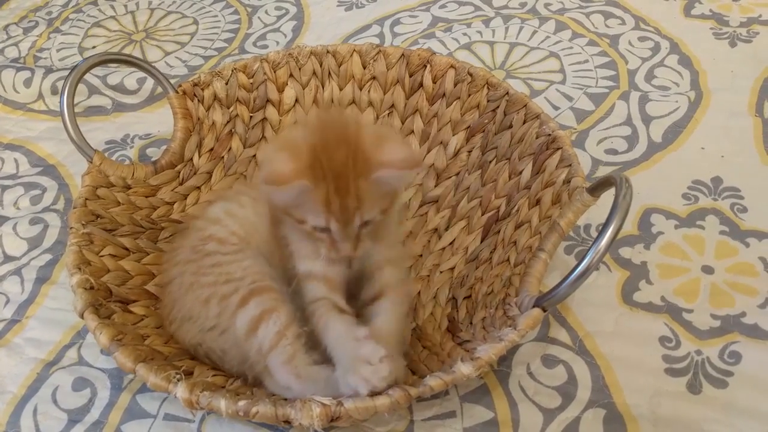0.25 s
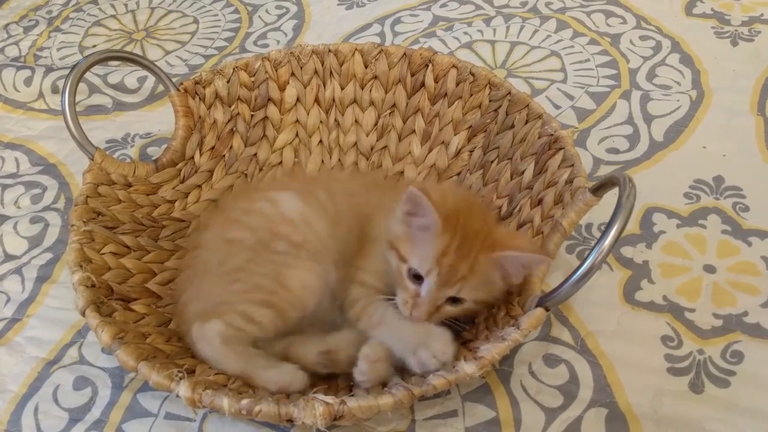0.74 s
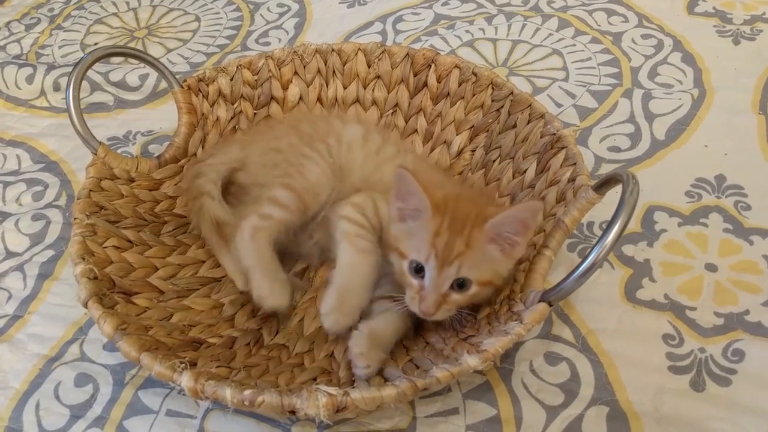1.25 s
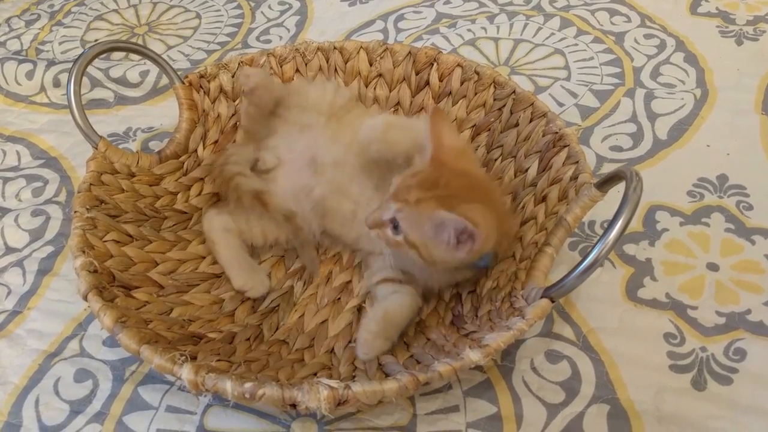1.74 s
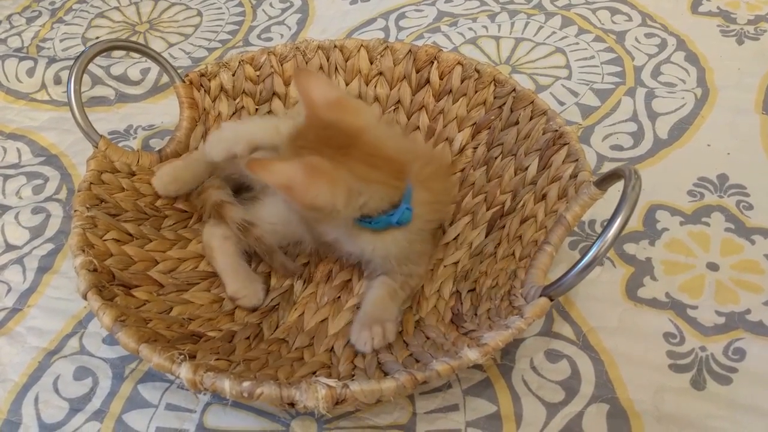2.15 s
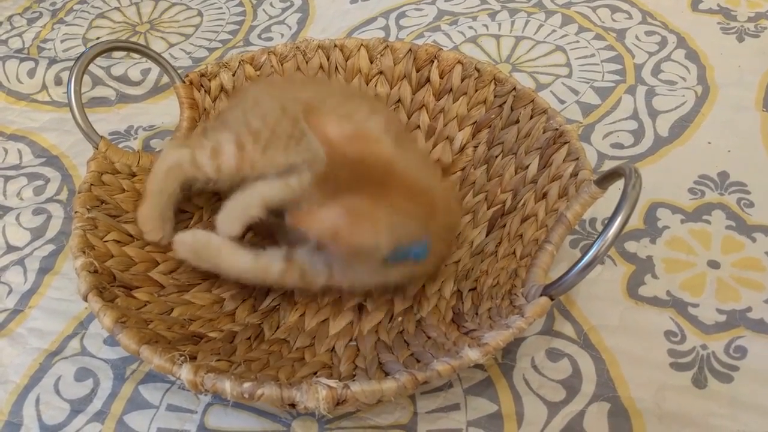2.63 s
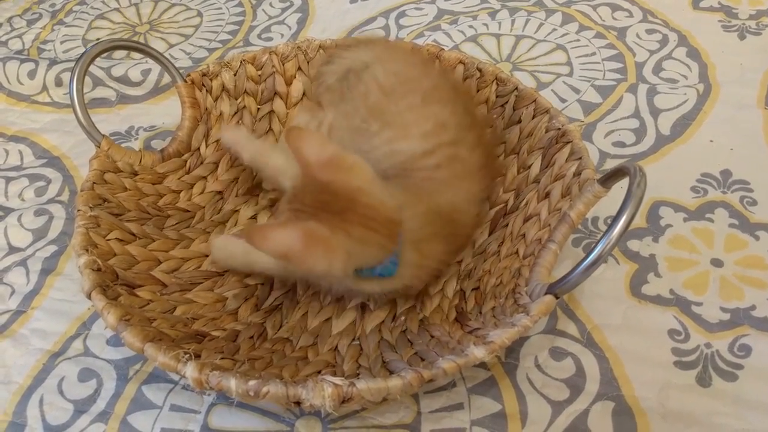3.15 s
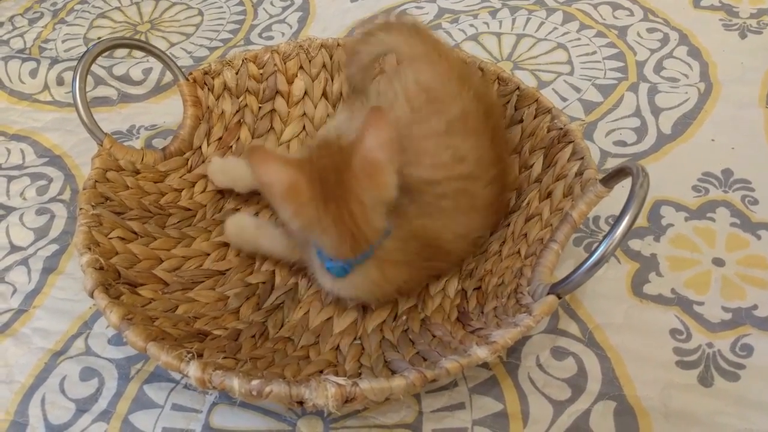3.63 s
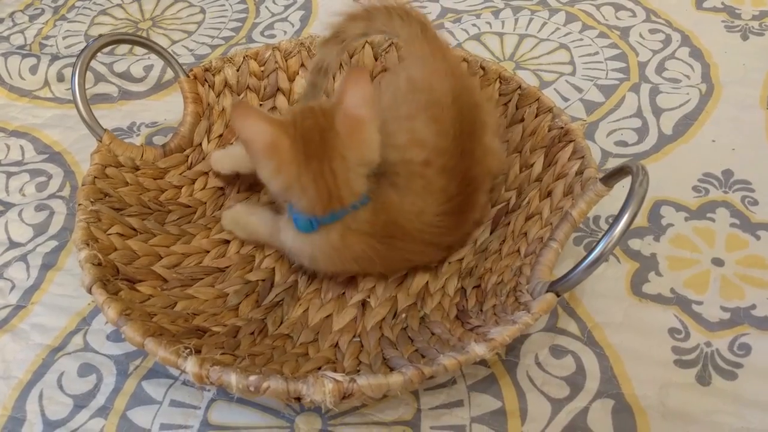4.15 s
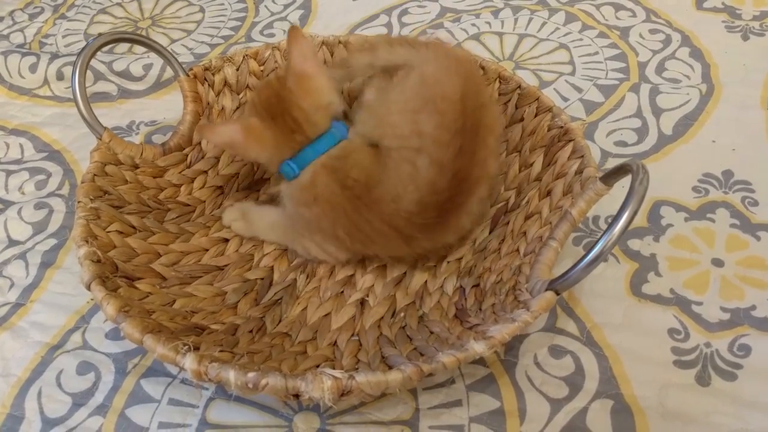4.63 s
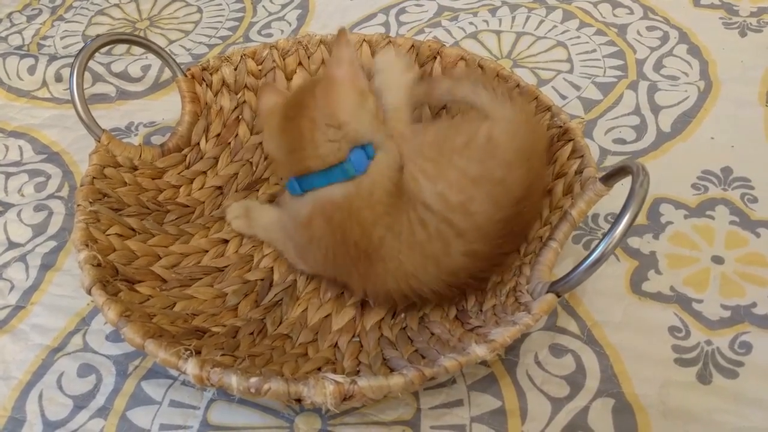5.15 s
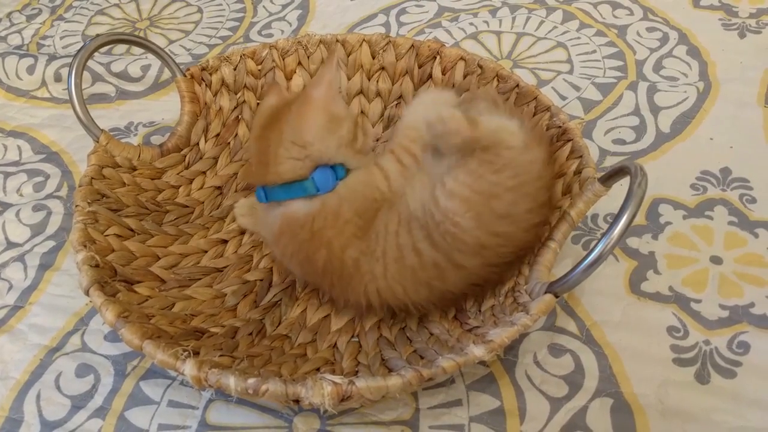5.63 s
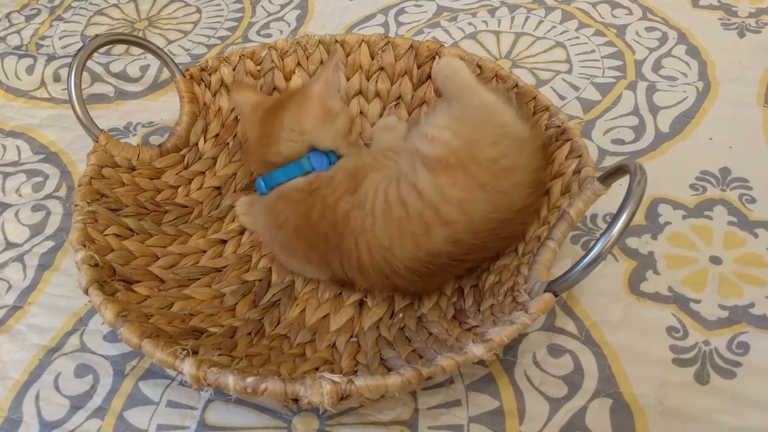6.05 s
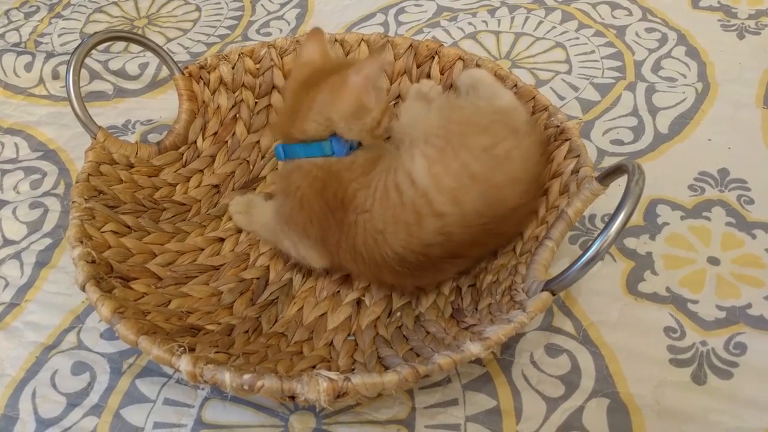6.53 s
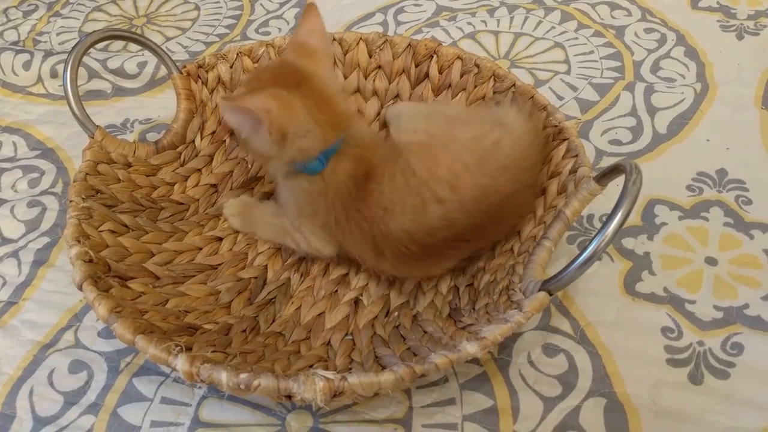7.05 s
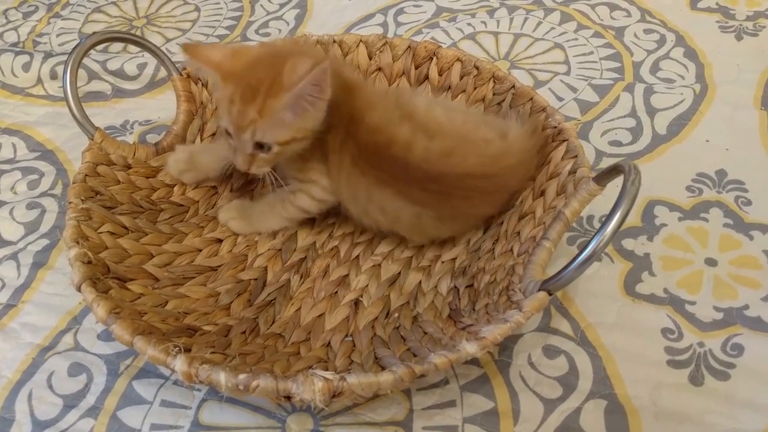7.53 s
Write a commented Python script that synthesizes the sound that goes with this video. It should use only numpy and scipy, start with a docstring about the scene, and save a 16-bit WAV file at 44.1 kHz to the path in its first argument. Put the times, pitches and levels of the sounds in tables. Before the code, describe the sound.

A low appliance hum and soft hiss lie beneath a small, high metallic bell, heard close up indoors in mono. Sparse jingles come first, then scratchy rubbing and brittle wicker clicks. A rapid cluster leads to one loud, piercing ting, followed by a calmer stretch with a muted basket thump. Finally the bell rattles densely among claw snaps, fur swishes and scuffs, with very little room echo.

```python
"""A kitten in a woven basket indoors, 7.8 s, over steady appliance hum and soft hiss.
From the start a pellet strikes and rolls in its collar bell, ringing three lobes, while fur and body rub the weave.
Claws snap strands from 0.7 s: crack, ring and knock. The body drops from 3.6 s, a resonant push and rattle.
The hardest bell strike comes at 4.2 s; from 6 s strikes crowd together up to the end."""
import sys
import numpy as np
from scipy import signal
from scipy.fft import rfft, irfft, next_fast_len
from scipy.io import wavfile
from scipy.ndimage import uniform_filter1d, map_coordinates

SR = 44100
rng = np.random.default_rng(int(sys.argv[2]) if len(sys.argv) > 2 else 0)


def dump_mix(stems):
    """Bounce the given channels to the path in sys.argv[1] as a 16-bit WAV at rate SR."""
    frames = np.atleast_2d(stems).T  # one column per channel
    limited = np.clip(frames, -1, 1)  # hard clip at full scale
    pcm = np.round(limited * 32767).astype(np.int16)
    wavfile.write(sys.argv[1], SR, pcm)


N = 343539

# Other motor lines of the appliance. Each row: frequency in Hz, mean level in dB rms.
MOTOR_LINES = [(58.8, -56), (221.4, -61), (244.3, -72), (259.1, -68)]
# Mains buzz, fan tones and their sums. Each row: mains buzz order, fan order, mean level in dB rms.
BUZZ_ORDERS = [(1, 0, -52), (1, 1, -54), (3, 0, -77), (4, 0, -76), (5, -1, -80), (5, 0, -69), (5, 1, -78),
               (0, 3, -69), (0, 4, -64), (0, 5, -58), (0, 6, -64), (0, 8, -72), (0, 9, -72)]
# Room rumble and hiss spectrum. Each row: frequency in Hz, relative density in dB.
ROOM_SPECTRUM = [(30, -23), (50, -8), (70, 2.5), (110, 2.5), (160, -5), (205, -8.5), (300, -10.5),
                 (350, -13), (600, -21.5), (1000, -25.5), (2200, -32), (3700, -34), (14000, -33.5),
                 (16000, -35)]
# Slow motion. Each row: time in seconds, fur rustle in dB (strands follow it), body drag in dB.
MOTION = [(0, -60.5, -71), (.45, -73, -68), (.95, -60.5, -75), (1.36, -81, -74), (1.45, -54, -75),
          (1.65, -61, -69), (2.2, -75, -67), (2.49, -63.5, -74), (2.69, -62, -65), (4.14, -70, -64.5),
          (4.34, -77, -66), (4.58, -66.5, -73), (5.03, -67, -64.5), (5.16, -97, -67.5), (5.4, -64, -71),
          (6.15, -70, -66), (6.5, -57, -68), (7, -62, -63.5), (7.27, -69.5, -63), (7.55, -52.5, -59),
          (7.79, -73, -63.5)]
# Short scuffs of paw and fur. Each row: time in seconds, nominal length in seconds, fur rustle in dB,
# strand rubbing in dB, body drag in dB, strand pitch in Hz.
SCUFFS = [(0.03, 0.17, -59, -70, -69, 5000), (0.839, 0.057, -67, -59.5, -80, 10400),
          (1.38, 0.061, -56.5, -73, -77, 6000), (1.43, 0.061, -56, -53, -69, 6400),
          (1.5, 0.063, -45, -52, -66, 5900), (1.582, 0.044, -61, -61, -71, 4530),
          (1.649, 0.14, -63, -54.5, -74, 4160), (1.834, 0.018, -63, -59, -79, 4500),
          (1.901, 0.023, -44.5, -51, -71, 1660), (1.975, 0.048, -57, -70, -61, 2100),
          (2.03, 0.035, -55, -64, -72, 5700), (2.15, 0.047, -47.5, -52, -61, 6130),
          (2.474, 0.021, -64, -59, -60, 8000), (2.789, 0.07, -71, -57, -57.5, 1050),
          (2.77, 0.095, -68, -58, -65, 2800), (3.29, 0.064, -73, -62, -59, 1000),
          (3.609, 0.061, -57, -55.5, -56, 9500), (3.67, 0.083, -59, -59.5, -58, 1680),
          (3.994, 0.16, -68, -61.5, -59.5, 5200), (4.335, 0.021, -55, -63, -66, 2100),
          (4.517, 0.035, -50, -54, -60, 3730), (4.557, 0.063, -58, -64, -68, 2400),
          (4.706, 0.042, -57.5, -55, -79, 4730), (4.771, 0.072, -62, -59, -77, 4350),
          (4.882, 0.068, -60, -63, -56, 1060), (5.011, 0.024, -57, -57, -54.5, 1680),
          (5.739, 0.028, -53.5, -63, -57.5, 5300), (5.833, 0.083, -84, -59, -65, 2340),
          (5.968, 0.1, -64, -52.5, -53, 1300), (6.062, 0.043, -62, -57.5, -60, 2440),
          (6.279, 0.075, -71, -59.5, -63, 5170), (6.39, 0.12, -59, -61, -56, 1080),
          (6.492, 0.049, -54, -60, -64, 5300), (6.523, 0.11, -77, -61, -65, 5500),
          (6.811, 0.048, -61, -71, -64, 5150), (6.933, 0.012, -48, -68, -62, 5300),
          (6.982, 0.01, -45, -53, -55, 9500), (7.146, 0.071, -55.5, -57, -74, 4470),
          (7.22, 0.02, -67, -58.5, -66, 1700), (7.34, 0.018, -46, -54, -49, 1050),
          (7.364, 0.074, -48, -56, -57, 5200), (7.486, 0.038, -67, -58, -57, 1700),
          (7.529, 0.031, -47, -48.5, -59, 4780), (7.558, 0.055, -62, -57, -63, 5300),
          (7.647, 0.019, -55, -71, -58, 5300)]
# Rustle of fur. Each row: frequency in Hz, relative density in dB.
FUR_SPECTRUM = [(1500, -12), (3500, -4.5), (6000, 0), (9000, -3), (12500, -2), (16000, -2)]
# Rubbing of strands. Each row: frequency in Hz, relative density in dB.
STRAND_SPECTRUM = [(900, -10), (2000, -7.5), (3500, -8), (5000, -8.5), (7500, -30)]
# Body dragging on the weave. Each row: frequency in Hz, relative density in dB.
DRAG_SPECTRUM = [(150, -18), (350, 0), (900, -1), (1600, -6), (2800, -13), (5000, -26)]
# Body drops on the basket floor. Each row: start in seconds, peak in dB, rattle t60 in seconds.
THUMPS = [(3.621, -42, 0.12), (4.008, -39, .15), (4.885, -27.5, 0.33), (6.806, -42, .05),
          (7.343, -36.5, 0.053)]
# Basket on its cushion. Each row: resonance in Hz, width in Hz, level in dB.
BASE_MODES = [(128, 40, 6), (333, 75, 4.5), (540, 170, -6.5), (1060, 710, -12)]
# Strand snaps. Each row: start in seconds, ring peak in dB, crack peak over it in dB,
# knock peak over it in dB, strand pitch in Hz.
SNAPS = [(0.7424, -40, -18, -26, 2530), (1.607, -44.5, -9, -19, 1430), (1.9008, -34.5, 8.5, -33, 1570),
         (1.9106, -39, -9, -24, 1500), (1.917, -40, -15, -21, 1460), (1.9816, -45, 6, -9, 1720),
         (2.153, -43.5, -5, -11, 1530), (2.1765, -40, -3, -22, 4050), (2.1993, -38, 6, -16, 1620),
         (2.2127, -41, 9, -19, 1350), (2.7851, -38.5, -15, -16, 3130), (2.8576, -44, -22, -18, 3830),
         (2.8676, -32, -23, -16, 3450), (3.099, -42.5, -15, -7, 1850), (3.3253, -37, 10, -0.5, 2300),
         (3.658, -41, -15, -20, 1640), (3.6877, -38, -20, -21, 1720), (3.9558, -40.5, -17, -16, 3670),
         (4.0118, -48, -16, 1, 1260), (4.0487, -44, -21, -10, 1550), (4.187, -44, -8, -7, 4370),
         (4.338, -49, 8, -8, 1850), (4.3814, -43.5, -13, -13, 4360), (4.5242, -34, -14, -14, 3710),
         (4.5695, -43, -9, -13, 2360), (5.017, -35, -1, -20, 1420), (5.38, -36, -22, -1.5, 2290),
         (5.551, -42.5, -25, -8, 1660), (5.696, -50, -17, 4, 1200), (5.7513, -42, -20, -21, 2680),
         (5.8341, -46, -26, -21, 2800), (6.0444, -46, -8, -7, 1300), (6.791, -36, -24, -10, 2850),
         (6.9118, -33.5, -20, -25, 2750), (6.9356, -51, 6, -9, 1200), (6.9814, -40, -7, -19, 3610),
         (7.0385, -39.5, 11.5, -22, 1600), (7.2443, -39.5, 6, -14, 2790), (7.341, -33.5, -11, -22, 940),
         (7.35, -44, 16, -5, 1380), (7.377, -48, 13, -9, 1200), (7.406, -36, 17, -21, 2780),
         (7.421, -39, -5, -13, 2300), (7.4916, -27.5, 13.5, -3, 1490), (7.5144, -52, -6, -12, 1220),
         (7.5906, -42, -13, -12, 3460), (7.656, -35.5, -19, -10, 1440)]
# The basket's low knock. Each row: resonance in Hz, width in Hz, level in dB.
WEAVE_MODES = [(660, 870, 0)]
# Lobes of the bell's shell. Each row: note in Hz before pull, overtone in Hz.
LOBES = [(4945, 11900), (5335, 12690), (5800, 13680)]
# Spells of the pellet rolling. Each row: start in seconds, length in seconds,
# level in dB for a lobe in full reach, place on the shell in degrees.
ROLLS = [(0, 0.15, -57, 112), (0.166, 0.16, -62.5, 108), (.4, 0.079, -70, 115), (.99, 0.054, -64, 66),
         (1.15, 0.19, -76, 110), (1.5, 0.13, -63, 118), (1.6, 0.26, -62, 60), (1.882, .28, -62.5, 84),
         (2.557, .12, -60.5, 55), (2.697, 0.31, -70, 85), (3.36, .3, -65, 57), (3.66, 0.3, -65.5, 84),
         (3.947, 0.19, -63.5, 5), (4.19, .12, -57, 62), (4.28, 0.17, -65, 62), (4.88, .14, -72, 55),
         (5.136, 0.068, -69, 45), (5.33, .03, -69, 62), (5.471, .04, -62, 62), (5.747, .13, -63.5, 64),
         (5.873, .26, -64, 66), (6.152, 0.3, -59, 116), (6.497, 0.16, -61, 100), (6.68, 0.11, -67, 40),
         (6.78, 0.38, -71, 5), (6.957, 0.12, -64, 48), (7.1, .14, -70, 95), (7.35, .25, -77, 85),
         (7.637, 0.14, -61.5, 5), (7.7, 0.098, -71, 130)]
# Pellet strikes. Each row: start in seconds, nominal peak in dB for a lobe in full reach,
# place on the shell in degrees.
STRIKES = [(.032, -35.5, 90), (.0443, -40, 125), (.0499, -52, 118), (.0725, -48, 74), (.178, -34, 77),
           (.2031, -48, 112), (.6737, -36, 60), (.693, -45, 63), (.9194, -47, 62), (.972, -41, 55),
           (1.02, -54, 62), (1.1814, -43, 55), (1.2506, -53, 94), (1.6227, -41, 67), (1.6583, -42, 60),
           (1.7794, -43, 86), (1.798, -35, 60), (1.8067, -35, 60), (1.819, -42, 56), (1.8871, -46, 104),
           (1.9257, -32.5, 55), (1.981, -33, 60), (2.023, -34.5, 100), (2.0391, -45, 111),
           (2.0569, -48, 97), (2.6443, -44, 69), (2.6812, -40, 59), (2.708, -42, 55), (2.7328, -41, 66),
           (2.7384, -37, 53), (2.7548, -37, 60), (2.8463, -44, 53), (2.9457, -38, 65), (3.0299, -43, 55),
           (3.3774, -33, 60), (3.3845, -33.5, 67), (3.39, -33.5, 77), (3.4457, -36, 56), (3.4538, -37, 77),
           (3.515, -36, 55), (3.527, -43, 37), (3.599, -37, 89), (3.606, -26.5, 69), (3.6166, -29, 62),
           (3.6229, -31, 58), (3.6392, -27, 57), (3.714, -37.5, 35), (3.7218, -41, 85), (3.7274, -37, 60),
           (3.7865, -39, 46), (3.847, -31.5, 72), (3.867, -36.5, 63), (3.8749, -41, 60), (3.8824, -43, 110),
           (4.0665, -35.5, 91), (4.0717, -45, 90), (4.1726, -36, 53), (4.18, -27.5, 53),
           (4.1906, -11.5, 56), (4.206, -27, 55), (4.2254, -35, 57), (4.234, -36, 43), (4.2408, -26.5, 75),
           (4.2526, -38, 54), (4.267, -41, 43), (4.2721, -41, 57), (4.284, -44, 60), (4.4398, -51, 62),
           (4.9513, -43, 61), (5.4871, -43.5, 64), (5.7644, -39, 46), (5.771, -38, 72), (5.781, -51, 69),
           (5.902, -34, 74), (5.9158, -41, 54), (5.939, -33.5, 81), (5.9785, -37.5, 58),
           (6.0243, -21.5, 61), (6.066, -38.5, 65), (6.0998, -44, 72), (6.1393, -42, 62),
           (6.1606, -38.5, 100), (6.179, -48, 102), (6.1923, -54, 91), (6.2, -39, 96), (6.217, -40, 100),
           (6.2351, -48, 110), (6.2722, -49, 100), (6.2827, -40.5, 100), (6.3169, -38, 112),
           (6.346, -32, 130), (6.3588, -35, 87), (6.3714, -25.5, 63), (6.382, -29, 120), (6.3977, -41, 120),
           (6.415, -31.5, 88), (6.429, -29, 64), (6.4343, -25, 56), (6.4408, -30, 59), (6.515, -30, 81),
           (6.5235, -25, 63), (6.5573, -32, 140), (6.5815, -25, 82), (6.6091, -39, 110), (6.6154, -36, 120),
           (6.6366, -37.5, 92), (6.6793, -37, 88), (6.6864, -44, 86), (6.7032, -40, 150),
           (6.9057, -43, 130), (6.9883, -41, 120), (7.0384, -41, 98), (7.0949, -33, 68), (7.103, -39, 88),
           (7.1124, -41, 67), (7.1517, -41, 100), (7.1857, -38, 46), (7.24, -37.5, 106), (7.2694, -45, 90),
           (7.2851, -41, 82), (7.357, -29.5, 78), (7.3715, -42, 94), (7.394, -26, 111), (7.4103, -31, 110),
           (7.451, -27, 115), (7.458, -32, 99), (7.467, -24, 94), (7.476, -30, 64), (7.4957, -33, 78),
           (7.5149, -40, 31), (7.5549, -34, 100), (7.5735, -28, 120), (7.6072, -38, 68),
           (7.6308, -35.5, 95), (7.6423, -41, 4), (7.6779, -39, 26), (7.709, -38, 87), (7.7353, -35, 130)]
# How freely the bell hangs off the fur. Each row: time in seconds, overtone over the note in dB,
# note t60 in seconds before the scaling by blow and chance.
FREEDOM = [(0, -26, 0.026), (.3, -24, 0.022), (.68, -13, .021), (1, -26, 0.022), (1.98, -17, 0.021),
           (2.1, -17, 0.032), (3.35, -23, 0.023), (3.52, -10, .024), (3.6, -25, .019), (4.195, -31, .03),
           (4.24, -11.5, .03), (4.3, -16, .03), (5, -22, 0.021), (6.13, -25, 0.022), (6.17, -6, 0.027),
           (6.35, -10, 0.02), (6.375, -31, 0.015), (6.55, -30, 0.018), (6.6, -25, 0.022), (7.1, -29, 0.021),
           (7.22, -24, .014), (7.79, -26, 0.013)]

MAINS_BUZZ_HZ, FAN_HZ = 119.95, 18.75
ROOM_DB_RMS, WALLS_DB = -52, -15
TOP_HZ = 15900
STRANDS_OVER_FUR_DB = -2.5
SNAP_T60_S = 0.015  # scaled for crack, ring and knock
LOBE_STEP_DEG, REACH_DEG = 60, 30  # lobe spacing; full ring within reach
MISS_DB_PER_DEG, FAINTEST_DB = 0.6, -22  # loss beyond reach and its limit
RING_DB_PER_BLOW_DB, RING_SPREAD_DB = .1, 1.5  # t60 gain: by blow over the mean, by chance
PULL_HZ_PER_DEG = 4.2  # off-centre strike pulls the note
PAIR_BEAT_HZ = 130


def amp(db):
    """Gain of a level in dB."""
    return 10 ** (np.asarray(db) / 20)


def unit(x):
    """x at rms 1."""
    return x / np.sqrt(np.mean(x ** 2) + 1e-20)


def peaked(x, peak_db):
    """x with its peak at peak_db."""
    return amp(peak_db) * x / np.max(np.abs(x))


def filtered(x, response):
    """x times a response over frequency in Hz, zero-padded."""
    size = next_fast_len(len(x) + 8192)
    spectrum = rfft(x, size) * response(np.fft.rfftfreq(size, 1 / SR))
    return irfft(spectrum, size)[:len(x)]


def coloured(x, points):
    """x through (Hz, dB) points on a log axis, at rms 1."""
    point_hz, point_db = np.transpose(points)

    def response(hz):
        return amp(np.interp(np.log(hz + 1), np.log(point_hz + 1), point_db))

    return unit(filtered(x, response))


def resonant(x, modes):
    """x through second-order resonances (Hz, width Hz, dB) of alternating sign."""
    def response(f):
        total = 0
        for k, (hz, width_hz, db) in enumerate(modes):
            damping = 1j * f * width_hz
            total = total + (-1) ** k * amp(db) * damping / (hz * hz - f * f + damping + 1e-9)
        return total

    return filtered(x, response)


def wobble(rate_hz):
    """Smooth random curve, rate_hz knots a second."""
    knots = rng.standard_normal(int(N * rate_hz / SR) + 4)
    return map_coordinates(knots, [np.arange(N) * rate_hz / SR])


def table(rows):
    """One value per sample for each column after the time."""
    time_s, *columns = np.transpose(rows)
    return [np.interp(np.arange(N) / SR, time_s, column) for column in columns]


def add(track, start_s, sound):
    """Mixes a sound into the track in place, cut at the track's end."""
    part = track[max(round(start_s * SR), 0):][:len(sound)]
    part += sound[:len(part)]


def puff(db, t60_s, t):
    """Noise burst falling 60 dB in t60_s."""
    return amp(db - 60 * t / max(t60_s, .001)) * rng.standard_normal(len(t))


def room_tone():
    """Steady lines of mains buzz, fan orders and their sums, over broad rumble and hiss."""
    t = np.arange(N) / SR
    buzz = [(m * MAINS_BUZZ_HZ + k * FAN_HZ, db) for m, k, db in BUZZ_ORDERS]
    lines = np.zeros(N)
    for hz, db in MOTOR_LINES + buzz:
        level = 2 ** .5 * amp(db + 0.58 * wobble(2.0))
        lines += level * np.sin(2 * np.pi * (hz * t + rng.random()))
    hiss = coloured(rng.standard_normal(N), ROOM_SPECTRUM)
    return lines + amp(ROOM_DB_RMS) * hiss


def walls(x, t60_s):
    """Short diffuse room answer: convolution with decaying noise after 4 ms."""
    t = np.arange(SR // 3) / SR
    tail = puff(0, t60_s, t) * (t > .004)
    return signal.fftconvolve(x, tail / np.linalg.norm(tail))[:N]


def scrape(spectrum, grain_db, patchy_db):
    """Friction noise: dense grains of uneven size, in patches of time and pitch."""
    grains = amp(grain_db * wobble(900)) * rng.standard_normal(N)
    z = signal.stft(grains, nperseg=256)[2]
    field = uniform_filter1d(rng.standard_normal(z.shape), size=9, axis=0)
    field = uniform_filter1d(field, size=5, axis=1)
    patches = signal.istft(z * amp(patchy_db * unit(field)), nperseg=256)[1][:N]
    return coloured(patches, spectrum)


def rustle():
    """Fur, strands and body rub on the weave: slow motion plus scuffs on strands of their own pitch."""
    fur_gain, drag_gain = amp(table(MOTION))
    strand_gain = amp(STRANDS_OVER_FUR_DB) * fur_gain  # slow motion only
    rubs = np.zeros(N)
    for s, length_s, fur_db, strand_db, drag_db, hz in SCUFFS:
        shape = signal.windows.tukey(round(1.44 * max(length_s, .005) * SR), .85)
        start_s = s - length_s / 5
        add(fur_gain, start_s, amp(fur_db) * shape)
        add(drag_gain, start_s, amp(drag_db) * shape)
        band = [(hz, .6 * hz, 0)]
        rub = resonant(resonant(rng.standard_normal(len(shape)), band), band)
        add(rubs, start_s, amp(strand_db) * shape * unit(rub))
    fur = fur_gain * scrape(FUR_SPECTRUM, grain_db=3.5, patchy_db=2.5)
    strands = strand_gain * scrape(STRAND_SPECTRUM, grain_db=1.0, patchy_db=3.0)
    drag = drag_gain * scrape(DRAG_SPECTRUM, grain_db=2.5, patchy_db=2.4)
    roughness = unit(amp(2.5 * wobble(500)))
    return fur + strands + rubs * roughness + drag


def thumps():
    """The body drops: one soft push and a noisy rattle excite the base resonances."""
    out, t = np.zeros(N), np.arange(SR // 3) / SR
    for s, peak_db, t60_s in THUMPS:
        push = np.exp(-t / 0.00059)
        rattle = puff(-3.5, t60_s, t)
        add(out, s, peaked(resonant(push + rattle, BASE_MODES), peak_db))
    return out


def snaps():
    """A strand slips off a claw: a bright crack, the strand's own short ring and a low knock."""
    out, t = np.zeros(N), np.arange(SR // 16) / SR
    for s, db, treble_db, knock_db, hz in SNAPS:
        strand_modes = [(hz, .3 * hz, 0), (1.82 * hz, 0.5 * hz, -6)]
        crack = resonant(puff(0, .45 * SNAP_T60_S, t), [(7500, 12000, 0)])
        ring = resonant(puff(0, 0.57 * SNAP_T60_S, t), strand_modes)
        knock = resonant(puff(0, 1.7 * SNAP_T60_S, t), WEAVE_MODES)
        add(out, s, peaked(crack, db + treble_db) + peaked(ring, db) + peaked(knock, db + knock_db))
    return out


def lobe_levels(db, deg):
    """Level in dB of each lobe for a touch at one place on the shell."""
    miss_deg = np.abs(deg - LOBE_STEP_DEG * np.arange(len(LOBES))) - REACH_DEG
    return db + np.clip(-MISS_DB_PER_DEG * miss_deg, FAINTEST_DB, 0)


def rolling():
    """Tiny uneven taps of the rolling pellet keep each lobe shimmering; a spell swells and fades."""
    out, gains = np.zeros(N), np.zeros((len(LOBES), N))
    for s, length_s, db, deg in ROLLS:
        swell = signal.windows.tukey(round(max(length_s, .01) * SR), .3)
        for gain, lobe_db in zip(gains, lobe_levels(db, deg)):
            add(gain, s, amp(lobe_db) * swell)
    for (hz, over_hz), gain in zip(LOBES, gains):
        hits = rng.random(N) < 900 / SR  # 900 taps a second on average
        taps = hits * rng.standard_normal(N) * amp(1.7 * wobble(60))
        out += gain * unit(resonant(taps, [(hz, 110, 0), (over_hz, 90, -16)]))
    return out


def bell():
    """Strikes ring the lobes by reach, with beating overtone pairs; the next landing damps the notes."""
    out, t = np.zeros(N), np.arange(SR // 11) / SR
    note_rise = 1 - np.exp(-t / 0.0006)
    over_rise = 1 - np.exp(-t / 0.00081)
    times_s, peaks_db, _ = np.transpose(STRIKES)
    waits_s = np.diff(np.append(times_s, N / SR))
    free_s, free_over_db, free_t60_s = np.transpose(FREEDOM)
    overs_db = np.interp(times_s, free_s, free_over_db)
    rings_s = np.interp(times_s, free_s, free_t60_s)
    for (s, peak_db, deg), wait_s, over_db, ring_s in zip(STRIKES, waits_s, overs_db, rings_s):
        longer_db = RING_DB_PER_BLOW_DB * (peak_db - peaks_db.mean())
        t60_s = max(ring_s, .005) * amp(longer_db + RING_SPREAD_DB * rng.standard_normal())
        # smooth 7 dB drop at the next landing
        damp_db = -7 / (1 + np.exp(np.clip((wait_s - t) / 0.00041, -30, 30)))
        for k, ((hz, over_hz), db) in enumerate(zip(LOBES, lobe_levels(peak_db, deg))):
            off_deg = np.clip(deg - LOBE_STEP_DEG * k, -REACH_DEG, REACH_DEG)
            # firmer touch of the fur: shorter ring, wider random note shift
            bend = 1 + .00012 / t60_s * rng.standard_normal()
            note_hz = (hz + PULL_HZ_PER_DEG * off_deg) * bend
            note_gain = amp(db + damp_db - 60 * t / t60_s) * note_rise
            note = note_gain * np.sin(2 * np.pi * note_hz * t)
            pair = np.sin(2 * np.pi * over_hz * t)
            pair += 0.59 * np.sin(2 * np.pi * (over_hz + PAIR_BEAT_HZ) * t + 6 * rng.random())
            over_gain = amp(db + over_db - 60 * t / (0.017 + t60_s)) * over_rise
            add(out, s, note + over_gain * pair)
        add(out, s, puff(peak_db - 22.5, 0.0037, t))  # pellet tick
    return out


def scene():
    """Kitten, basket and room in one channel; bell strikes, snaps and thumps feed the walls."""
    near = bell() + snaps() + thumps()
    echo = amp(WALLS_DB) * walls(near, t60_s=0.17)
    return (near + echo + rolling() + rustle() + room_tone())[None]


def record(dry):
    """Steep low-pass at the band limit TOP_HZ."""
    return filtered(dry[0], lambda hz: 1 / (1 + (hz / TOP_HZ) ** 120))[None]


dry = scene()
out = record(dry)
dump_mix(out)
```